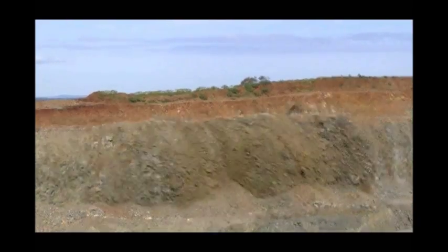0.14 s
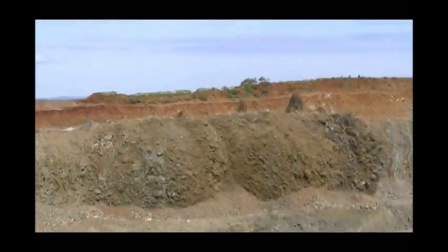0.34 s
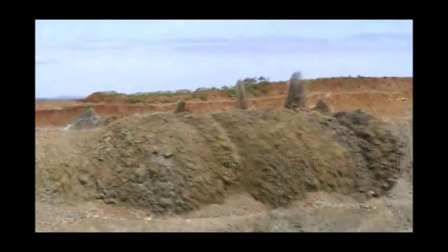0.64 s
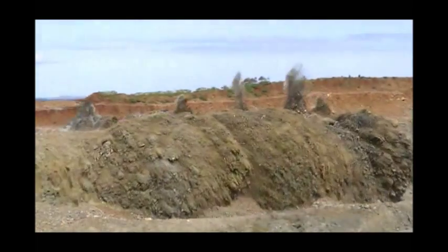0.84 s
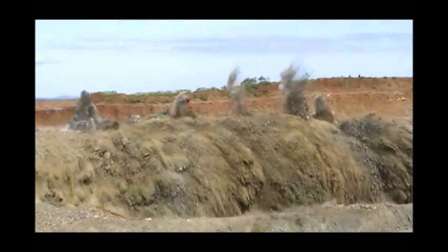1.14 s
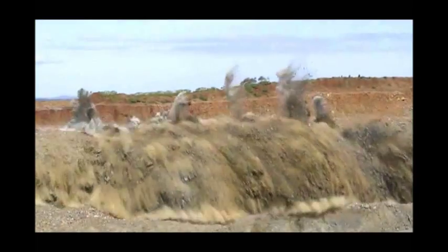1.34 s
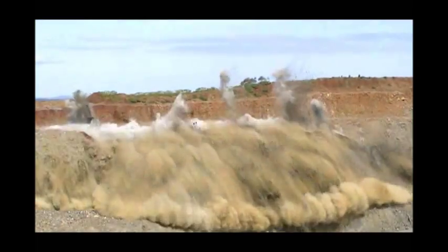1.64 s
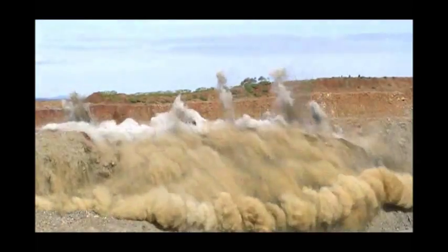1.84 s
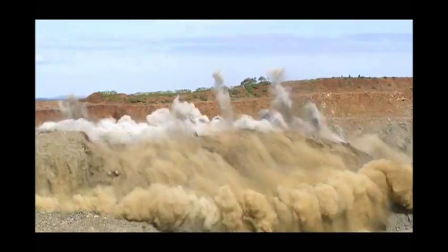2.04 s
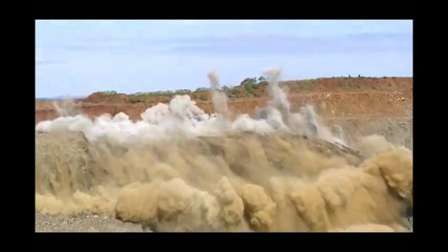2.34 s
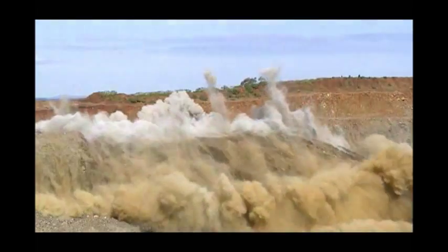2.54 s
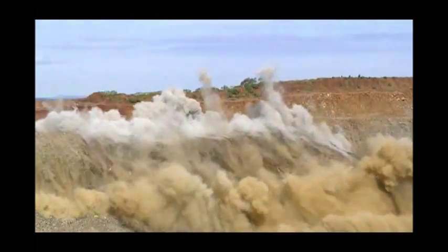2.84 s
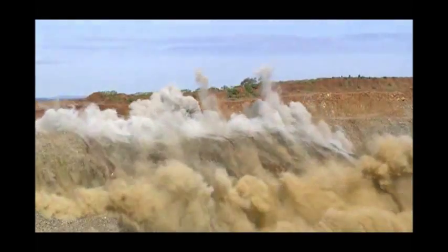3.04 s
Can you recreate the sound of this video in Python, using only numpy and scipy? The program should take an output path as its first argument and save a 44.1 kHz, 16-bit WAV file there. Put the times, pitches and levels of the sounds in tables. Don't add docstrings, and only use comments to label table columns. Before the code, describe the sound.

Quarry blast cracks, rattles and booms, then thrown rock lands in a swelling, sliding roar

```python
import sys
import numpy as np
from scipy import signal
from scipy.fft import rfft, irfft
from scipy.io import wavfile
from scipy.ndimage import uniform_filter1d

SR = 44100
rng = np.random.default_rng(int(sys.argv[2]) if len(sys.argv) > 2 else 0)


def voltage_ratio(decibels):
    exponent = np.asarray(decibels, float) / 20
    return 10 ** exponent


def master_out(mix):
    frames = np.transpose(np.atleast_2d(mix))
    ceiling = np.clip(frames, -1, 1)
    pcm = np.round(ceiling * 32767).astype(np.int16)
    wavfile.write(sys.argv[1], SR, pcm)


N = 141561
EARLY = int(.8 * SR)


def level(x, db):
    return x * voltage_ratio(db) / np.sqrt(np.mean(x ** 2))


def colour(x, points):
    hz, db = np.array(points, float).T
    size = 8192
    f = np.maximum(np.arange(size // 2 + 1) * SR / size, 1)
    log_gain = np.interp(np.log(f), np.log(hz), db) * np.log(10) / 20
    cepstrum = irfft(log_gain)
    cepstrum[1:size // 2] *= 2
    cepstrum[size // 2 + 1:] = 0
    impulse = irfft(np.exp(rfft(cepstrum)))[:size // 2]
    return signal.fftconvolve(x, impulse)[:N]


def coloured_noise(points):
    return level(colour(rng.standard_normal(N), points), 0)


def bright(hz):
    band = signal.butter(2, [hz / 1.45, hz * 1.45], "band", fs=SR, output="sos")
    return level(signal.sosfilt(band, rng.standard_normal(N)), 0)


def walk(rate_hz):
    k = int(SR / rate_hz)
    steps = np.repeat(rng.standard_normal(N // k + 1), k)
    return 0.6 * uniform_filter1d(uniform_filter1d(steps, k), k)[:N]


def fade(t, start_s, t60_s, rise_s=.0001):
    return np.clip((t - start_s) / rise_s, 0, 1) * voltage_ratio(-60 * np.maximum(t - start_s, 0) / t60_s)


def pulse(t, s, db, hz, turns, phase):
    u = (t - s) * hz
    return voltage_ratio(db) * np.exp(-(u / turns) ** 2) * np.cos(2 * np.pi * u + phase)


CRACK_S = .039


def before_blast():
    quiet_lift_db = 12.5
    return voltage_ratio(quiet_lift_db * np.clip((CRACK_S - np.arange(N) / SR) * 1000, 0, 1))


# (frequency [Hz], level [dB])
WIND_COLOUR = [(25, -42.5), (80, -19.5), (150, -4.5), (260, -9.5), (380, -30.5), (1000, -38)]


def wind():
    wind_db, left_db = -49, -1.5
    shared, own, lifted = (voltage_ratio(wind_db + walk(3.9)) * coloured_noise(WIND_COLOUR) for _ in range(3))
    ground = lifted * (before_blast() ** 1.03 - 1)
    left = 0.31 * ground - voltage_ratio(left_db) * (0.35 * shared + 0.63 * own)
    return left, shared + ground


# (frequency [Hz], level [dB])
RUMBLE_COLOUR = [(25, -30), (60, -8), (135, -6), (289, -7), (430, -2.5), (640, -13.5), (1500, -25),
                 (5000, -55.5)]
BURST_S = .4405


def rumble(t):
    before_db, after_db, fade_db_per_s = -38, -30.5, -9
    lift = np.clip((t - BURST_S) / 0.028, 0, 1)
    db = before_db + lift * (after_db - before_db + fade_db_per_s * (t - BURST_S)) + 2.2 * walk(25.0)
    return np.clip((t - CRACK_S) / .01, 0, 1) * voltage_ratio(db) * coloured_noise(RUMBLE_COLOUR)


# (time [s], peak [dB])
GRIT = [(0.7473, -61), (0.7942, -53), (0.8141, -51), (0.8331, -52), (0.87, -59), (0.9055, -53),
        (0.914, -42), (0.9588, -53.5), (0.9768, -57), (1.0077, -55), (1.0416, -53), (1.0516, -47),
        (1.1544, -44), (1.1763, -45), (1.2022, -47), (1.285, -48), (1.37, -38), (1.3888, -44),
        (1.4085, -46), (1.4238, -49), (1.576, -49), (1.6373, -45), (1.64, -42), (1.6505, -46),
        (1.8967, -44.5), (1.994, -55), (2.3357, -52), (2.4155, -48), (2.436, -45), (2.5885, -43),
        (2.7637, -54), (2.8805, -52)]


def grit(t):
    trim_db, t60_s, centre_hz = 8, 0.016, 7500
    env = sum(voltage_ratio(db + trim_db) * fade(t, s, t60_s) for s, db in GRIT)
    return env * bright(centre_hz)


# (time [s], peak [dB], pitch [Hz])
HEAVES = [
    (0.452, -23, 150),
    (0.467, -10.5, 125),
    (.495, -14, 190),
    (0.514, -21, 130),
    (.535, -16, 170),
]
# (time [s], peak [dB], pitch [Hz])
THUDS = [(0.588, -31, 168), (0.61, -18.5, 150), (0.654, -18, 123), (0.6815, -23, 153), (0.7127, -37, 174),
         (0.7335, -26, 94), (0.763, -22, 201), (0.7967, -28, 118), (0.8416, -27, 103), (0.9104, -26, 116),
         (0.9333, -30, 136), (0.9513, -25, 133), (0.98, -25, 161), (1.1468, -39, 148), (1.2006, -35, 111),
         (1.35, -25, 178), (1.467, -27, 141)]


def thuds(t):
    trim_db, turns = -4.5, 0.82
    heard = HEAVES + THUDS[:-3]
    return sum(pulse(t, s, db + trim_db, hz, turns, 0) for s, db, hz in heard)


# (time [s], peak [dB], pitch [Hz])
BOULDERS = [
    (0.969, -31, 406),
    (1.179, -25, 384),
    (1.194, -27, 410),
    (1.214, -25, 375),
    (1.548, -47, 380),
    (1.837, -34, 390),
    (2.041, -39, 362),
    (2.55, -38, 400),
    (2.75, -32, 406),
]


def boulders(t):
    trim_db, turns = 3.5, 1.3
    return sum(pulse(t, s + 1 / hz, db + trim_db, hz, turns, 0) for s, db, hz in BOULDERS)


# (time [s], level [dB], brightness [dB per band], heavy-rock share [dB])
ROCKFALL = [(.58, -45, -1.5, -0.5), (.62, -43, 2.5, 6.5), (.75, -39, 0.6, 2.5), (.89, -35.5, 0, -1.5),
            (1.0, -32, 0.2, -6), (1.11, -30, 2.2, 0), (1.2, -27, -0.5, -1.5), (1.32, -26, 1, 0.5),
            (1.5, -22.5, 1.5, 0.5), (1.7, -22, -1.5, -4.5), (1.85, -24, -0.7, 0.5), (2.051, -23, -0.55, 0),
            (2.35, -24.5, -.5, -1), (2.55, -23.5, 1, 1), (2.72, -23, 3, 1.5), (2.88, -23.5, 1.5, -0.5),
            (3.02, -28, 2, 2.5), (3.21, -25, 2.8, 3)]
# (frequency [Hz], level [dB])
ROCK_COLOUR = [(60, -60), (200, -19), (378, -2.5), (700, 1), (1400, 1.5), (3300, -9), (7000, -28.5),
               (10000, -46), (14000, -74)]
ROCK_BANDS_HZ = [0, 450, 900, 1500, 3000, 6000, 22050]


def rockfall(t):
    rocks_per_s, spread_db, slide_db, trim_db = 3000, 3.5, 3.5, 3
    s, db, tilt, heavy = np.array(ROCKFALL).T
    f = np.arange(N // 2 + 1) * SR / N
    mass = 0
    for k, (lo, hi) in enumerate(zip(ROCK_BANDS_HZ, ROCK_BANDS_HZ[1:])):
        chance, strength = rng.random((2, N))
        struck = chance < rocks_per_s * 2. ** (k - 2.5) / SR
        hits = struck * voltage_ratio(np.minimum(-spread_db * np.log(1 - strength), 12))
        stream = level(hits - hits.mean(), 0) + voltage_ratio(slide_db) * rng.standard_normal(N)
        band = np.sqrt(1 / (1 + (f / hi) ** 6) - 1 / (1 + (f / (lo + 1)) ** 6))
        band_db = min(k - 2.5, .8) * np.interp(t, s, tilt) + 1.4 * walk(9)
        if k < 2:
            band_db = band_db + np.interp(t, s, heavy)
        mass = mass + irfft(rfft(stream) * band, N) * voltage_ratio(band_db)
    course = voltage_ratio(np.interp(t, s, db) + trim_db + 1.4 * walk(11.91)) * np.clip((t - .5) / 0.037, 0, 1)
    return level(colour(mass, ROCK_COLOUR), 0) * course


def shots(t, rows, scatter, trim_db, scatter_db, turns, phase):
    t, scatter = t[:EARLY], scatter[:EARLY]
    out = np.zeros(EARLY)
    for s, db, hz, *_ in rows:
        out += pulse(t, s, db + trim_db, hz, turns, phase)
        out += voltage_ratio(db + scatter_db) * fade(t, s - 0.75 / hz, 0.021, 0.00034) * scatter
    return np.pad(out, (0, N - EARLY))


# (frequency [Hz], level [dB])
ECHO_COLOUR = [(100, -51.5), (300, -10), (600, 3), (1500, -2), (3000, -11), (5000, -22.5), (8000, -35.5),
               (12000, -61)]
# (time [s], peak [dB], pitch [Hz])
ECHOES = [(0.0484, -15, 1149), (0.0522, -10, 719), (0.0728, -13, 539), (0.077, -20, 532), (0.082, -14, 756),
          (0.0977, -21, 1113), (0.1091, -13, 976), (0.1261, -20, 1081), (0.1397, -21, 1451),
          (0.1502, -18, 590), (0.1645, -19, 929), (0.1819, -18, 803), (0.1976, -19, 828),
          (0.2101, -20, 791), (0.2217, -20, 795), (0.2324, -17, 710), (0.2414, -16, 981),
          (0.2458, -16, 776), (0.2663, -18, 1153), (0.2754, -21, 964), (0.2891, -22, 1430),
          (0.2947, -16, 674), (0.3012, -17, 1103), (0.3234, -15, 1037), (0.3486, -20, 1220),
          (0.3555, -20, 763), (0.3942, -16, 968), (0.4229, -20, 1397), (0.4266, -16, 1248),
          (0.4329, -22, 848)]


def echoes(t, scatter):
    bed_db = -33.5
    bed = (t > CRACK_S) * np.exp(-np.maximum(t - BURST_END_S, 0) / 0.073) * voltage_ratio(bed_db + 2.0 * walk(60))
    return bed * scatter + shots(t, ECHOES, scatter, trim_db=-5, scatter_db=-11.5, turns=1, phase=1.3)


def crack(t):
    swing_db, swing_hz, swing_t60_s = 2, 419, 0.027
    snap_db, snap_t60_s, tail_db, tail_t60_s = -7, 0.033, -25, 0.22
    cycle = np.sin(2 * np.pi * swing_hz * (t - CRACK_S) + 0.77)
    swing = -voltage_ratio(swing_db) * fade(t, CRACK_S, swing_t60_s) * cycle
    env = voltage_ratio(snap_db) * fade(t, CRACK_S, snap_t60_s) + voltage_ratio(tail_db) * fade(t, CRACK_S, tail_t60_s)
    return swing + env * coloured_noise(ECHO_COLOUR)


# (time [s], peak [dB], pitch [Hz], snap [dB])
DETONATORS = [(0.0574, -12, 601, -33), (0.0637, -12, 300, -32), (0.0668, -14, 687, -33),
              (0.0888, -16, 1400, -29), (0.093, -13, 1032, -33), (0.1041, -10, 1075, -29),
              (0.1148, -7, 1204, -26), (0.1178, -9, 989, -28), (0.1225, -8, 1032, -37),
              (0.1357, -7, 1118, -34), (0.1456, -13, 1075, -30), (0.1595, -7, 1400, -35),
              (0.1707, -9, 1204, -35), (0.1754, -13, 1247, -37), (0.1883, -11, 773, -35),
              (0.202, -11, 816, -31), (0.2141, -4, 1118, -25), (0.2284, -10, 902, -29),
              (0.2575, -13, 1290, -29), (0.2596, -8, 1290, -25), (0.2703, -9, 989, -37),
              (0.2818, -7, 1290, -28), (0.3148, -14, 1400, -27), (0.3162, -14, 1450, -33),
              (0.3307, -6, 1032, -35), (0.3413, -12, 1075, -28), (0.372, -12, 902, -32),
              (0.3836, -13, 902, -34), (0.4038, -14, 1290, -34), (0.4092, -11, 945, -30),
              (0.4122, -13, 945, -36)]


def detonators(t, scatter):
    snap_trim_db, snap_t60_s, snap_hz = -12, 0.0059, 5100
    snap = sum(voltage_ratio(db + snap_trim_db) * fade(t[:EARLY], s - .0007, snap_t60_s) for s, _, _, db in DETONATORS)
    ripple = shots(t, DETONATORS, scatter, trim_db=-0.6, scatter_db=-11.5, turns=.55, phase=1.3)
    return ripple + np.pad(snap, (0, N - EARLY)) * bright(snap_hz)


# (time [s], peak [dB], pitch [Hz])
CHARGES = [(0.4418, -9, 918), (0.4446, -15, 634), (0.4483, -10, 1158), (0.453, -4, 481), (0.4576, -15, 635),
           (0.4619, -6, 434), (0.4688, -6, 376), (0.4724, -18, 417), (0.4749, -8, 638), (0.4779, -11, 739),
           (0.4859, -13, 504), (0.4902, -18, 644), (0.4924, -5, 486), (0.4953, -17, 703),
           (0.5009, -12, 451), (0.5036, -10, 606), (0.5076, -11, 564), (0.5106, -13, 443),
           (0.513, -17, 605), (0.516, -16, 634), (0.5203, -16, 583), (0.526, -15, 739), (0.5303, -12, 526),
           (0.5344, -8, 518), (0.5391, -12, 990), (0.5417, -7, 630), (0.5466, -11, 851), (0.5489, -16, 846),
           (0.5515, -13, 693), (0.554, -14, 682), (0.5738, -18, 740)]
# (frequency [Hz], level [dB])
BURST_COLOUR = [(40, -13.5), (112, 0.5), (230, -7.5), (414, -0.5), (678, -7), (1500, -10.5), (3120, -23),
                (6850, -46), (10000, -91)]
BURST_END_S = 0.549


def charges(t):
    burst_db, rise_s, fall_s = -21.5, 0.0014, 0.018
    deep = coloured_noise(BURST_COLOUR)
    gate = np.clip((t - BURST_S) / rise_s, 0, 1) * np.exp(-np.maximum(t - BURST_END_S, 0) / fall_s)
    burst = gate * voltage_ratio(burst_db + 1.6 * walk(80)) * deep
    return burst + shots(t, CHARGES, deep, trim_db=-2, scatter_db=-19, turns=0.59, phase=0)


def scene():
    left_db, left_corner_hz, left_bass_share = -3.7, 1850, .17
    left_rumble_db, left_grit_db = -27, -5.5
    t = np.arange(N) / SR
    scatter = coloured_noise(ECHO_COLOUR)
    field = rumble(t) + thuds(t) + rockfall(t) + boulders(t)
    field = field + echoes(t, scatter) + crack(t) + detonators(t, scatter) + charges(t)
    low = signal.lfilter(*signal.butter(1, left_corner_hz, fs=SR), field)
    left = voltage_ratio(left_db) * (field - (1 - left_bass_share) * low) + voltage_ratio(left_rumble_db) * rumble(t)
    wind_left, wind_right = wind()
    return np.array([left + wind_left + voltage_ratio(left_grit_db) * grit(t),
                     field + wind_right + grit(t)])


def lowpass(x, hz):
    return signal.sosfilt(signal.butter(4, hz, fs=SR, output="sos"), x)


def top_cut(x):
    return signal.sosfilt(signal.butter(12, 14900, fs=SR, output="sos"), x)


def record(dry):
    mic_top_hz, hiss_top_hz, hiss_db, clip = 8700, 7800, -64, .6
    hiss = voltage_ratio(hiss_db) * before_blast() * lowpass(rng.standard_normal(dry.shape), hiss_top_hz)
    mix = np.clip(lowpass(dry, mic_top_hz) + hiss, -clip, clip)
    return top_cut(mix)


dry = scene()
out = record(dry)
master_out(out)
```